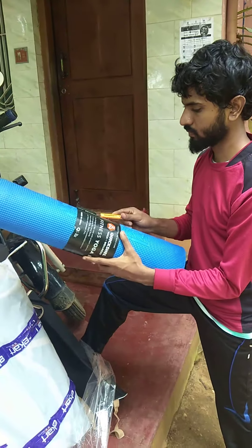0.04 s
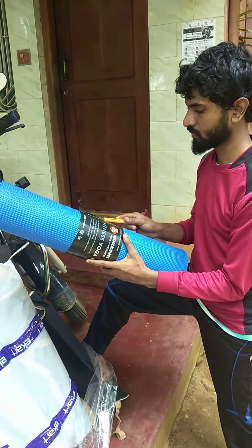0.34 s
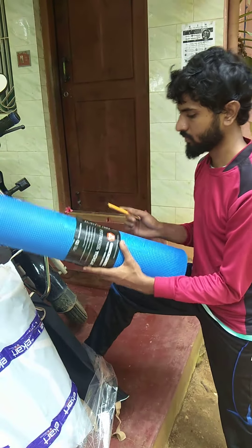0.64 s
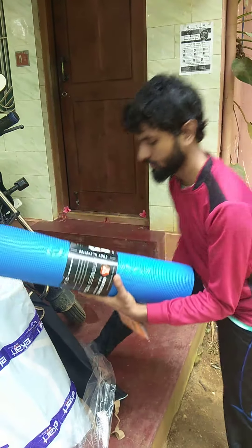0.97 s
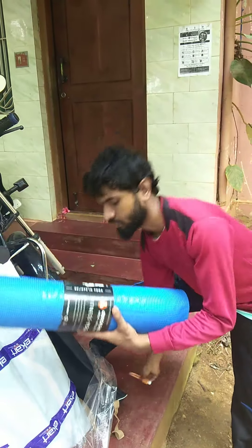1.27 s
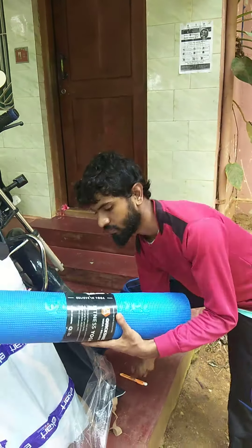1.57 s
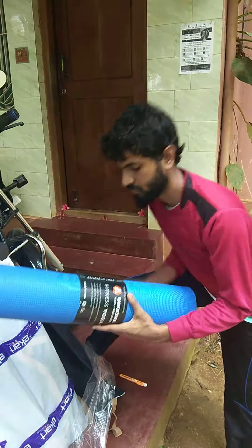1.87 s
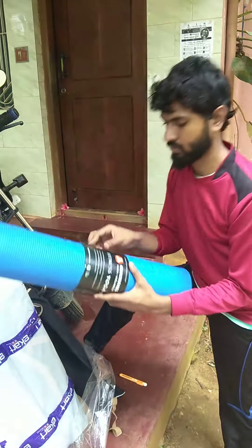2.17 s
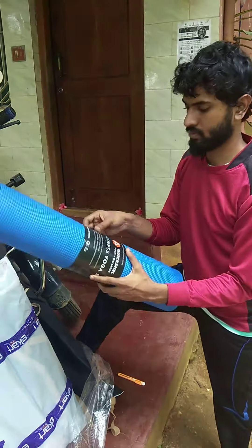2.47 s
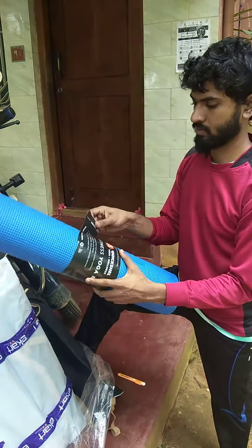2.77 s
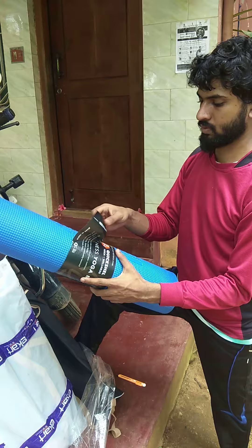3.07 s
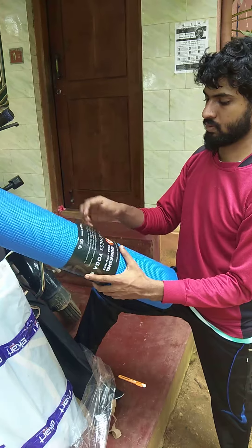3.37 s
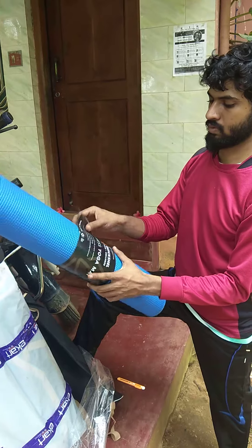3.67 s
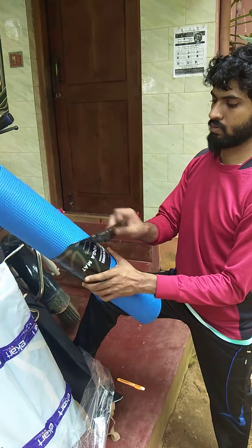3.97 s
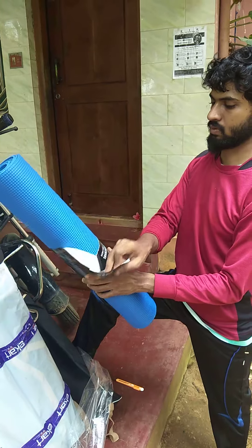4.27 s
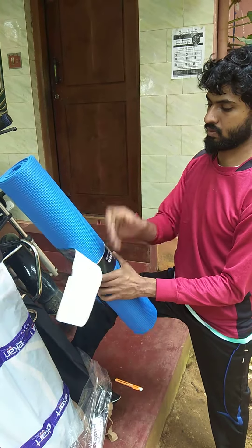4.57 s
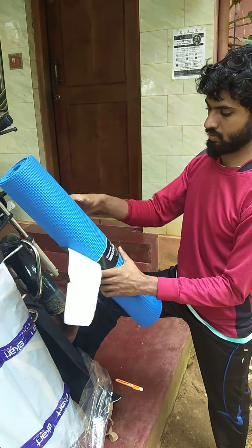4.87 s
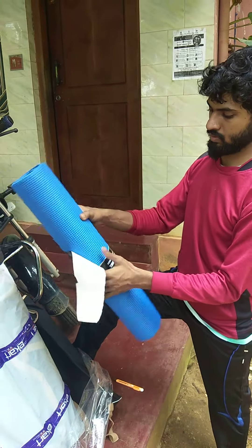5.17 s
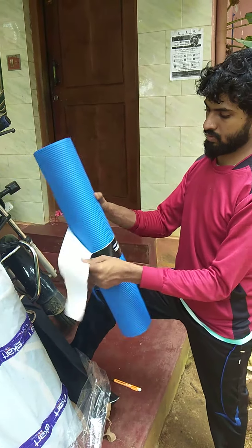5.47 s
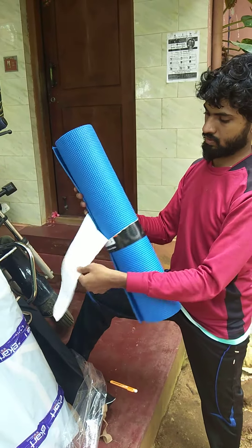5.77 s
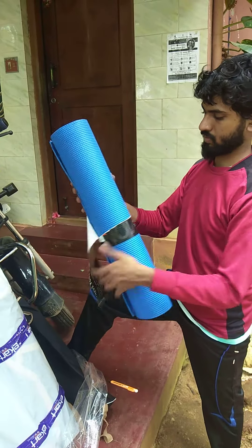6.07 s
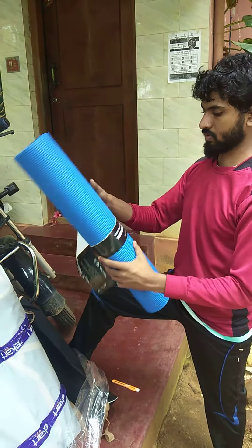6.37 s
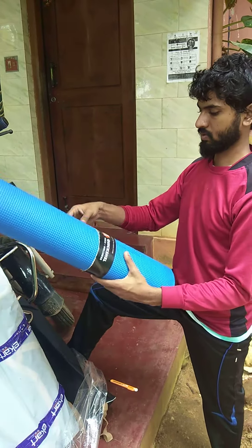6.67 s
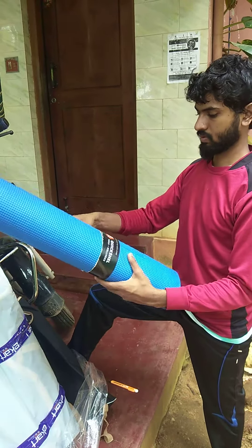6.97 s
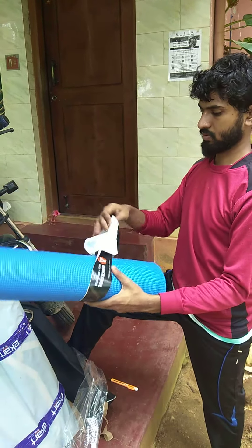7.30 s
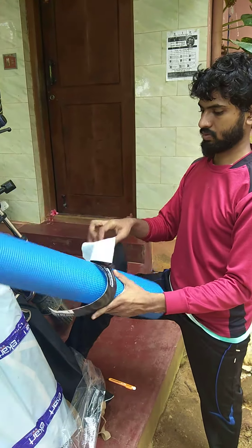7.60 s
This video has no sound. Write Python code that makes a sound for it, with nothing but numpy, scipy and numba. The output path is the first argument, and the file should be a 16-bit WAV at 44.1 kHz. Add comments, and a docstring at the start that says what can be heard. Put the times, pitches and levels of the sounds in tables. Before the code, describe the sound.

Outdoors, a knife clatters down, then stiff paper rips and crinkles in brief bursts while an engine hums some way off.

```python
"""Unwrapping a foam mat on a porch

A paper sticker band is slit, picked at and torn off a rolled foam mat in seven short rips;
after the cut, the knife clatters to the floor. Each rip is a stream of tiny breaks in fibre
and glue that make the loose sheet ring, and the stiff paper snaps and crinkles now and then.
A slow engine throbs some way off, over the wash of a distant street."""
import sys
import numpy as np
from scipy import signal
from scipy.fft import rfft, irfft
from scipy.io import wavfile
from scipy.ndimage import uniform_filter1d, map_coordinates
from numba import njit

SR = 44100
rng = np.random.default_rng(int(sys.argv[2]) if len(sys.argv) > 2 else 0)


def transcribe(signal):
    """Save signal, clipped to [-1, 1], as a 16-bit WAV file at the path in sys.argv[1]."""
    frames = np.atleast_2d(signal).T
    limited = np.clip(frames, -1, 1)
    pcm = np.round(limited * 32767).astype(np.int16)
    wavfile.write(sys.argv[1], SR, pcm)


N = 341334
T = np.arange(N) / SR


def gain(db):
    """Turn decibels into a number to multiply by."""
    return 10 ** (np.asarray(db) / 20)


def unit(x):
    """Scale a signal to an average power of 1."""
    return x / np.sqrt(np.mean(x ** 2))


def curve(rows):
    """Join (time, value) points with straight lines."""
    return np.interp(T, *np.transpose(rows))


def ramp(start_s, length_s):
    """Rise evenly from 0 to 1."""
    return np.clip((T - start_s) / length_s, 0, 1)


def noise():
    """White noise: an even hiss."""
    return rng.standard_normal(N)


def wander(per_s):
    """Slide between random values, about 1 in size, per_s times a second."""
    hold = max(int(SR / per_s), 2)
    steps = np.repeat(rng.standard_normal(N // hold + 2), hold)
    return unit(uniform_filter1d(steps, hold)[rng.integers(hold):][:N])


def colour(x, points, size=8192):
    """Shape the tone with (frequency, level) points, fading steeply outside them."""
    hz, db = np.transpose(points)
    bin_hz = np.arange(size // 2 + 1) * SR / size
    octave, knots = np.log2(np.maximum(bin_hz, 1)), np.log2(hz)
    octaves_outside = np.abs(octave - np.clip(octave, knots[0], knots[-1]))
    gain_db = np.interp(octave, knots, db) - 30 * octaves_outside
    # folding the cepstrum makes a filter that rings only after a click, never before it
    cepstrum = irfft(np.log(gain(np.maximum(gain_db, -90))))
    cepstrum[1:size // 2] *= 2
    cepstrum[size // 2 + 1:] = 0
    response = irfft(np.exp(rfft(cepstrum)))
    return signal.fftconvolve(x, response / np.linalg.norm(response))[:N]


def flicker(x, patch_hz, patch_s, depth_db):
    """Let narrow bands of the sound swell and sink at random, each on its own."""
    frames = dict(nperseg=1024, noverlap=768)
    hz, s, bands = signal.stft(x, SR, **frames)
    chance = rng.standard_normal((256, 512))
    patches = np.meshgrid(hz / patch_hz, s / patch_s, indexing="ij")
    swell = map_coordinates(chance, patches, order=2, mode="wrap")
    return signal.istft(bands * unit(gain(depth_db * swell)), SR, **frames)[1][:N]


def ring(x, tones):
    """Let x strike (frequency, width, level) tones; the narrower a tone, the longer it rings."""
    age = T[:2048]
    response = sum(gain(db) * width * np.exp(-np.pi * width * age) * np.sin(2 * np.pi * hz * age)
                   for hz, width, db in tones)
    return signal.fftconvolve(x, response / np.linalg.norm(response))[:N]


def touches(rows, lead_db=-12, lead_s=0.0047):
    """The force of brief contacts: a light touch, then a burst that dies away."""
    force = 0
    for s, db, fade_s in rows:
        gap = np.minimum(np.abs(T - s), 1)
        lead_in = gain(lead_db) * np.exp(-gap / lead_s)
        force = force + gain(db) * np.where(T < s, lead_in, np.exp(-gap / fade_s))
    return force


def tiny_breaks(per_s, spread_db, even_s):
    """Dense clicks, many small and a few large, with about equal energy in every even_s seconds."""
    sizes = gain(spread_db * np.minimum(rng.exponential(size=N), 4))
    clicks = (rng.random(N) < per_s / SR) * sizes * np.sign(noise())
    local_power = np.abs(uniform_filter1d(clicks ** 2, int(even_s * SR)))
    return clicks / np.sqrt(local_power + 1e-9)


def spurt(start_s, length_s, db, swell_db, rise_db_per_s=1108.5, fall_db_per_s=330):
    """A loudness shape that catches quickly, swells or sags, then dies as the pull slackens."""
    early_s, late_s = np.clip(start_s - T, 0, 1), np.clip(T - start_s - length_s, 0, 1)
    held_db = db + swell_db * (ramp(start_s, length_s) - .5)
    return gain(held_db - rise_db_per_s * early_s - fall_db_per_s * late_s)


# Levels in all tables are relative: the functions scale them further.
# how loud the engine is (time [s], level [dB])
ENGINE_LOUDNESS = [(0.1, -39), (1.87, -40.5), (2.82, -38.5), (3.78, -40), (5.68, -38), (7.56, -40.5),
                   (7.6, -42.5)]
# the exhaust note, dull and bright (multiple of the cycle rate, level [dB])
DULL_NOTE = [(1, -31.5), (2, -27), (3, -7.5), (4, -28.5), (5, 2.5), (6, -15), (7, 3), (8, -8), (9, -13),
             (10, -5.5), (11, -5.5), (12, -30), (13, -17.5), (14, -18), (15, -37), (16, -28.5), (17, -28),
             (18, -31.5), (19, -36), (20, -31.5), (21, -20.5), (22, -25), (23, -26.5)]
BRIGHT_NOTE = [(1, -47.5), (2, -33.5), (3, -8), (4, -24.5), (5, 2), (6, -14.5), (7, 4.5), (8, -5.5),
               (9, -1), (10, -2), (11, -8), (12, -29.5), (13, -22.5), (14, -2), (15, -19), (16, -10),
               (17, -20), (18, -36.5)]
# the low rumble around that note (frequency [Hz], level [dB])
RUMBLE_COLOUR = [(25, -29.5), (44, -25.5), (54, -17), (78, -13), (110, -5), (150, -6), (175, -3), (215, -4),
                 (260, -14), (340, -16), (480, -48)]


def engine(cycle_hz=20.16, smear=0.19, waver_db=1.53, rumble_db=-7, boost_db=1):
    """Repeated firing makes a wavering note; the way round the houses smears each beat."""
    phase = 2 * np.pi * cycle_hz * T + 0.044 * wander(11)
    brightness = ramp(start_s=2.2, length_s=1.98)
    bright_db = dict(BRIGHT_NOTE)
    note = 0
    for k, dull_db in DULL_NOTE:
        db = (1 - brightness) * dull_db + brightness * bright_db.get(k, -32) + waver_db * wander(3.7)
        note = note + gain(db) * np.cos(k * phase - smear * k * k)
    rumble = gain(rumble_db) * colour(noise(), RUMBLE_COLOUR)
    return (unit(note) + rumble) * gain(curve(ENGINE_LOUDNESS) + boost_db)


# the street's wash, its faint drone and the background hiss (frequency [Hz], level [dB])
STREET_COLOUR = [(280, -17.5), (400, 4.5), (620, -1.5), (800, 0), (1150, -13.5), (1600, -15), (2600, -26)]
DRONE_COLOUR = [(340, -14), (385, -10), (430, 5), (480, -1), (540, -4.5)]
HISS_COLOUR = [(400, -5.5), (600, -5), (1000, 2.5), (1450, -3), (1950, -6.5), (2400, -3), (2750, -10),
               (3200, -7.5), (3900, -7.5), (4300, -15), (4700, -22), (5500, -25.5), (6500, -34.5),
               (7500, -52)]
# how loud the wash is (time [s], level [dB])
STREET_LOUDNESS = [(0.02, -49.5), (0.72, -54.5), (3.57, -56), (7.7, -57.5)]
# broad swells of the drone (middle [s], half length [s], level [dB])
SWELLS = [(0.508, 1.1, -56.5), (2.26, 0.61, -54.5), (4.11, 0.74, -52)]


def outdoors(drop_db=6, drone_db=-2, hiss_db=-54.5):
    """A faint background hiss flickers finely; a far street drones and fades as traffic moves off."""
    leaving = ramp(start_s=4.4, length_s=0.56)
    wash = colour(noise(), STREET_COLOUR) * gain(curve(STREET_LOUDNESS) - drop_db * leaving)
    swells = sum(gain(db + drone_db) * np.exp(-((T - s) / half_s) ** 2) for s, half_s, db in SWELLS)
    drone = colour(noise(), DRONE_COLOUR) * swells
    hiss = flicker(colour(noise(), HISS_COLOUR), patch_hz=90, patch_s=.03, depth_db=5)
    street = flicker(wash + drone, patch_hz=46, patch_s=.045, depth_db=4.2)
    return street + hiss * gain(hiss_db)


# the blade cuts, and later scrapes in its holder (time [s], level [dB], fade [s], pitch [Hz])
BLADE_SQUEAKS = [(.456, -49.5, 0.008, 4840), (.506, -64, .006, 4970), (.58, -66, 0.015, 5700),
                 (1.577, -54, .01, 4870), (1.661, -59, 0.006, 4930)]
# the knife hits the floor (time [s], level [dB], fade [s])
FLOOR_HITS = [(1.262, -39.5, 0.011), (1.378, -32.5, .012), (1.435, -39.5, 0.02)]
# the ring of its plastic holder (frequency [Hz], width [Hz], level [dB])
HOLDER_TONES = [(2680, 110, -1), (3190, 55, 1), (3370, 37, -8), (4050, 58, -24), (4420, 80, -7),
                (4870, 59, -1)]
# gritty scraping, by knife or fingernail (frequency [Hz], level [dB])
SCRAPE_COLOUR = [(900, -23.5), (2100, -7.5), (2700, 3.5), (3250, 10), (4400, 5), (5200, -1), (6000, -9),
                 (6800, -17.5), (7500, -30.5)]


def knife(squeak_width_hz=180, scrape_db=-5, holder_db=-5.5):
    """The thin steel blade squeaks; on the floor the knife chatters on grit and its holder rings."""
    blade = 0
    for s, db, fade_s, hz in BLADE_SQUEAKS:
        stroke = touches([(s, db, fade_s)], lead_db=-2.5, lead_s=0.01) * noise()
        squeak = ring(stroke, [(hz, squeak_width_hz, 0)])
        blade = blade + squeak + gain(scrape_db) * colour(stroke, SCRAPE_COLOUR)
    chatter = touches(FLOOR_HITS) * noise()
    return blade + colour(chatter, SCRAPE_COLOUR) + gain(holder_db) * ring(chatter, HOLDER_TONES)


# sharp snaps of the paper (time [s], level [dB], sheet compared with edge [dB])
PAPER_SNAPS = [(2.258, -20, -25), (2.734, -27, -16), (2.795, -30, -14), (2.853, -30.5, -14),
               (2.925, -25, -14), (2.94, -26, -10), (2.978, -36, 10), (3.035, -19.5, -17),
               (3.07, -19.5, -17), (3.9114, -29, -12), (3.9462, -21, 1.5), (4.048, -21, -24),
               (4.0958, -27, -24), (4.428, -22.5, -9), (4.468, -35, -18), (5.429, -22, 3),
               (5.6198, -24, -1), (5.657, -22, -9), (5.743, -18.5, -28), (5.7932, -8.5, -8.5),
               (5.8413, -21, 0), (7.028, -33.5, 6), (7.0663, -32, 16), (7.137, -19.5, -4),
               (7.1867, -25, 5.5)]
# the tone of a snap, and of the loose sheet in snaps and rips (frequency [Hz], level [dB])
SNAP_COLOUR = [(2000, -20), (2900, -9.5), (3300, 4), (4300, 3), (4900, -10), (5600, -8), (6500, -23),
               (7200, -54)]
SHEET_COLOUR = [(450, 1.5), (650, -19), (850, 3), (1200, 5.5), (1600, 13), (2000, 5.5), (2400, -11),
                (3200, -11)]


def snaps(boost_db=4, fade_s=.003):
    """A larger piece of paper lets go at once, and a few fibres follow it."""
    edge, sheet = np.zeros(N), np.zeros(N)
    age = T[:2048]
    for s, db, sheet_db in PAPER_SNAPS:
        snap = .06 * rng.standard_normal(len(age)) * np.exp(-age / fade_s)
        snap[0] = -1  # the first big break
        span = slice(int(s * SR), int(s * SR) + len(age))
        edge[span] += snap * gain(db + boost_db)
        sheet[span] += snap * gain(db + boost_db + sheet_db)
    return colour(edge, SNAP_COLOUR) + colour(sheet, SHEET_COLOUR)


# the stiff paper buckles (start [s], length [s], level [dB], swell [dB])
BUCKLES = [(2.262, 0.003, -42.5, -14.5), (2.849, 0.0086, -51, -9), (2.922, .022, -51.5, -8),
           (5.428, 0.0089, -38.5, 6), (5.493, 0.011, -45, 9), (5.737, 0.0084, -43.5, -1),
           (5.771, 0.042, -49.5, 5)]
# how it rings (frequency [Hz], width [Hz], level [dB])
CRINKLE_TONES = [(3360, 210, 10), (3780, 250, 11.5), (4440, 140, 8.5), (4810, 57, 10), (4770, 84, -45)]


def crinkles():
    """Small creases pop one after another and make the stiff paper ring."""
    pops = tiny_breaks(per_s=1100, spread_db=2.5, even_s=.012)
    loudness = sum(spurt(*row) for row in BUCKLES)
    return ring(pops * loudness, CRINKLE_TONES)


# spurts of tearing, one list per pull
# (start [s], length [s], level [dB], swell [dB], sheet compared with edge [dB])
PULLS = [
    [(2.698, 0.0056, -44.5, 1.5, 1), (2.72, 0.033, -65, 11, -10), (2.79, 0.043, -56, -1.5, 1)],
    [(2.924, 0.02, -47, -0.5, 3), (2.982, 0.099, -46, 0.5, 0.5)],
    [(3.91, 0.02, -40.5, -3, -5.5), (3.946, 0.066, -38, -3.5, -8)],
    [(4.095, 0.12, -47.5, 2, -15), (4.235, 0.072, -41, -1, -5), (4.335, 0.071, -45.5, 1.5, -3.5)],
    [(5.32, 0.075, -58.5, 10, 5), (5.436, 0.11, -43.5, -5.5, -0.5), (5.545, 0.059, -39.5, 0.5, -2),
     (5.622, 0.034, -40.5, -5.5, -4)],
    [(5.69, 0.022, -53.5, 5, 1), (5.74, 0.033, -51.5, -2.5, 0), (5.8, 0.028, -47, 6.5, 0.5)],
    [(7.03, 0.027, -47.5, 4, 4), (7.09, 0.061, -42.5, 6.5, -0.5), (7.183, 0.018, -35.5, -3.5, 0.5),
     (7.218, 0.018, -45.5, 4, -5.5), (7.3, 0.015, -55, -8, -23)],
]
# the sheet rings differently in each pull, one list each (frequency [Hz], width [Hz], level [dB])
SHEET_TONES = [
    [(895, 120, -3), (1740, 87, -2), (2430, 89, -7)],
    [(850, 85, 3.5), (1780, 94, -3.5), (2130, 87, -7.5), (2530, 68, -2.5)],
    [(842, 68, 5.5), (1570, 120, -2), (2200, 200, -8), (2590, 140, -2)],
    [(790, 65, 8.5), (1330, 140, -2), (3230, 140, -7), (4160, 110, 6)],
    [(790, 200, 7.5), (1440, 240, -2), (1890, 120, 4.5), (2830, 230, 3)],
    [(860, 650, -11), (1800, 200, -4), (2750, 180, -5.5)],
    [(770, 107, 4.5), (1550, 620, -3.5), (2750, 280, 3)],
]
# its pitch slides as it lengthens or tightens, one value per pull (slide [octaves/s])
SHEET_SLIDES = [-0.14, -0.16, 0, 0.53, -0.53, -0.081, -0.35]
# the rasp of the tearing edge (frequency [Hz], level [dB])
EDGE_COLOUR = [(1500, -37), (2400, -10), (2950, -10), (3300, 0.5), (3600, -1), (4200, -0.5), (4650, -6.5),
               (5100, -9), (5700, -13.5), (6500, -18.5), (7300, -36)]


def rips(edge_db=-0.9, sheet_db=-7, ring_db=-1, catch_db=2, crossing_s=.0025):
    """The tear catches and runs; each tiny break sounds at the edge and shakes the loose sheet."""
    fibres = tiny_breaks(per_s=3600, spread_db=2.7, even_s=.02) * unit(gain(catch_db * wander(240)))
    edge, sheet, ringing = 0, 0, 0
    for pull, tones, slide in zip(PULLS, SHEET_TONES, SHEET_SLIDES):
        shake = 0
        for start_s, length_s, db, swell_db, shake_db in pull:
            tear = fibres * spurt(start_s, length_s, db, swell_db)
            edge = edge + tear
            shake = shake + tear * gain(shake_db)
        first_s, last_s = pull[0][0], pull[-1][0] + pull[-1][1]
        since_middle_s = np.clip(T, first_s, last_s) - np.average(T, weights=shake ** 2)
        sheet = sheet + shake
        ringing = ringing + flexing_sheet(shake, tones, slide * since_middle_s)
    # the ringing builds a moment later, once the bending wave has crossed the sheet
    ringing = np.roll(ringing, int(crossing_s * SR))
    body = gain(sheet_db) * colour(sheet, SHEET_COLOUR) + gain(ring_db) * ringing
    rasp = gain(edge_db) * colour(edge, EDGE_COLOUR)
    return flicker(rasp + body, patch_hz=220, patch_s=.014, depth_db=3)


def flexing_sheet(shake, tones, slide_octaves, bend=.018, bends_per_s=18):
    """The sheet's ringing tones slide with the pull and waver as it flexes."""
    tuning = 2 ** slide_octaves * (1 + bend * wander(bends_per_s))
    power = sum(gain(db) ** 2 * np.pi * width / SR for hz, width, db in tones)
    ringing = sum((-1) ** k * gain(db) * resonate(shake, hz * tuning, float(width))
                  for k, (hz, width, db) in enumerate(tones))
    return ringing / np.sqrt(power)


@njit
def resonate(x, hz, width):
    """A filter that passes one band of sound around a moving pitch."""
    passed, band_state, low_state = np.empty(len(x)), 0., 0.
    for i in range(len(x)):
        step, damping = np.tan(np.pi * hz[i] / SR), width / hz[i]
        band = (band_state + step * (x[i] + 1e-18 - low_state)) / (1 + step * (step + damping))
        band_state = 2 * band - band_state
        low_state += 2 * step * band
        passed[i] = damping * band
    return passed


# fingers pick at the sticker and brush it (time [s], level [dB], fade [s])
PICKS = [(3.637, -53, .012), (3.696, -48, 0.006), (3.725, -47, 0.0074), (4.503, -53.5, .005),
         (4.631, -53, 0.0054), (4.653, -54, 0.028), (6.63, -60.5, 0.0051), (6.693, -52, 0.0081),
         (6.772, -43.5, 0.012), (6.944, -45, 0.0064), (7.521, -52.5, 0.011), (7.628, -48.5, 0.029)]
# between pulls they feel for a loose corner (start [s], end [s])
SEARCHES = [(3.62, 3.76), (6.44, 6.8)]


def fingers(rub_db=-65, uneven_db=7, touches_per_s=60):
    """Nails scratch up bright bursts of fine grit, and fingertips rub faintly and unevenly."""
    searching = sum((T > start_s) & (T < end_s) for start_s, end_s in SEARCHES)
    rubbing = searching * gain(rub_db) * unit(gain(uneven_db * wander(touches_per_s)))
    return colour((touches(PICKS) + rubbing) * noise(), SCRAPE_COLOUR)


def porch(x, fade_s=0.2, echo_db=-7, delay_s=0.0056):
    """Tiled wall, door and steps return a short, dense echo that falls 60 dB in fade_s."""
    age = T[:SR // 2]
    tail = rng.standard_normal(len(age)) * np.exp(-np.log(1000) * age / fade_s) * (age > delay_s)
    echo = signal.fftconvolve(x, tail / np.linalg.norm(tail))[:N]
    return (x + gain(echo_db) * echo) / np.sqrt(1 + gain(echo_db) ** 2)


def scene():
    """Paper and knife close by, engine and street behind, in one channel."""
    close_by = rips() + crinkles() + snaps() + fingers() + knife()
    return (porch(close_by) + engine() + outdoors())[None]


def record(dry):
    """A phone microphone cuts off the highest treble."""
    top_hz = 7150
    return signal.sosfilt(signal.ellip(8, .2, 70, top_hz, fs=SR, output="sos"), dry)


dry = scene()
out = record(dry)
transcribe(out)
```